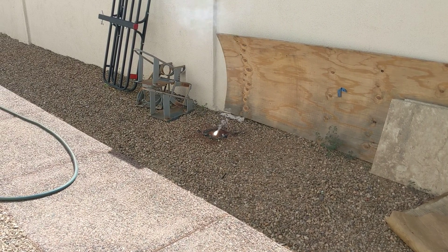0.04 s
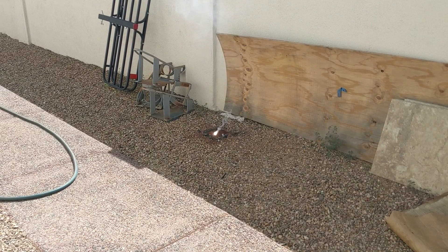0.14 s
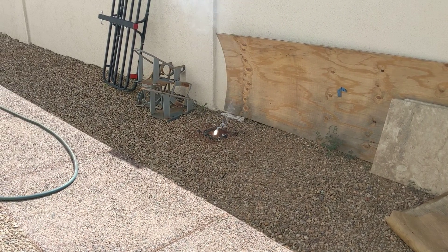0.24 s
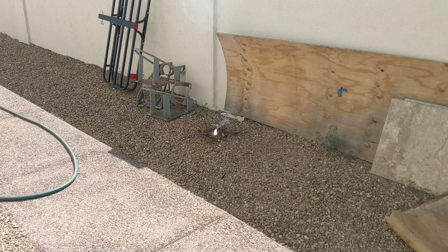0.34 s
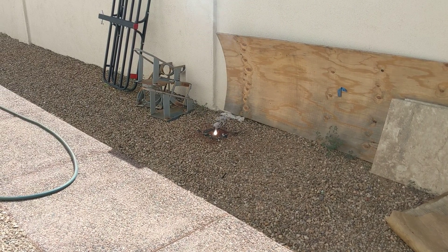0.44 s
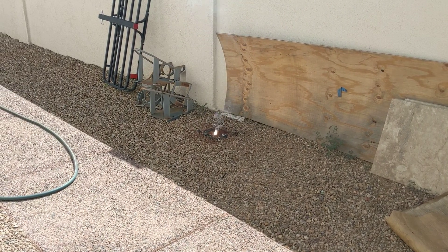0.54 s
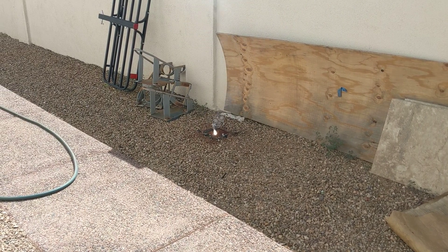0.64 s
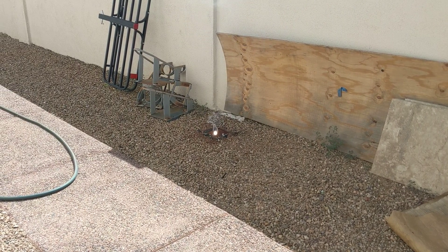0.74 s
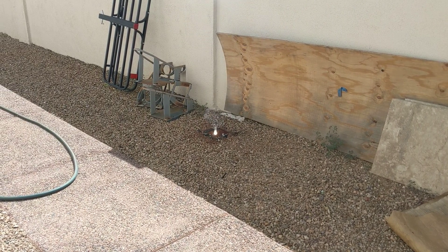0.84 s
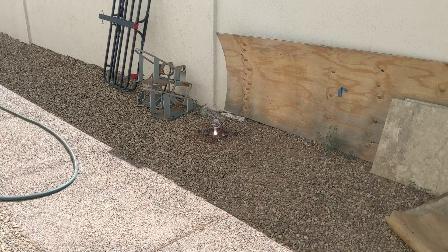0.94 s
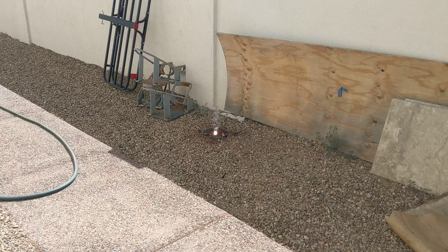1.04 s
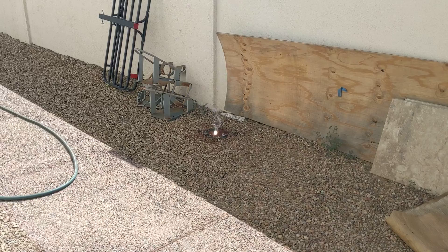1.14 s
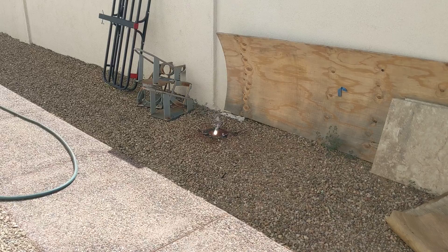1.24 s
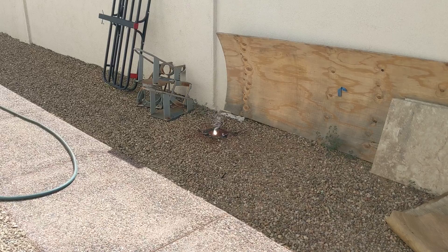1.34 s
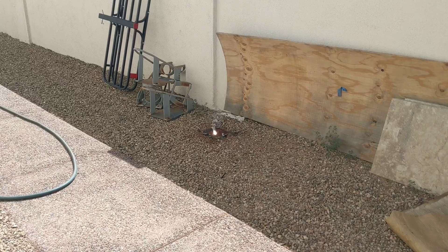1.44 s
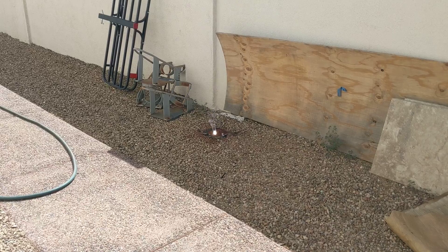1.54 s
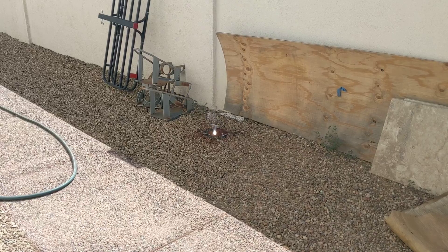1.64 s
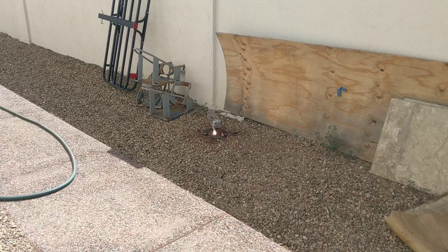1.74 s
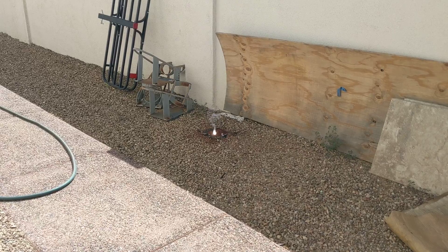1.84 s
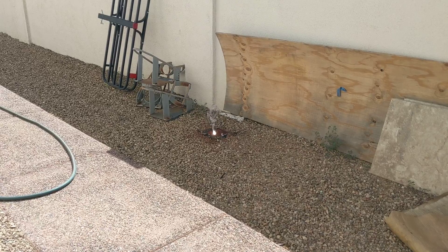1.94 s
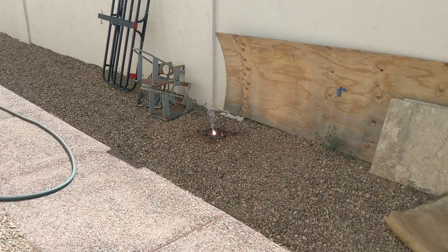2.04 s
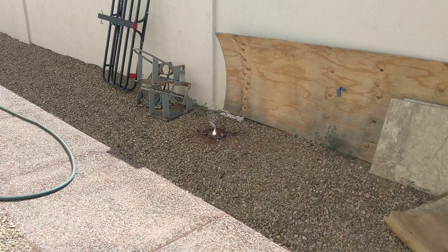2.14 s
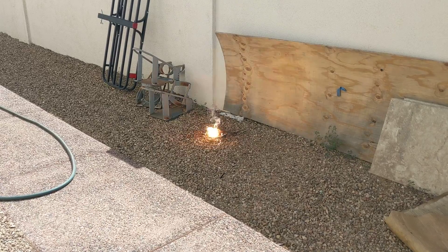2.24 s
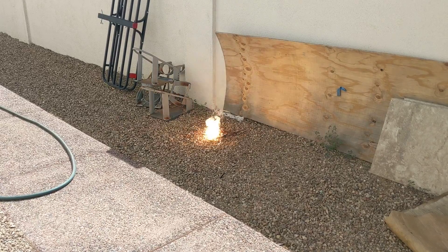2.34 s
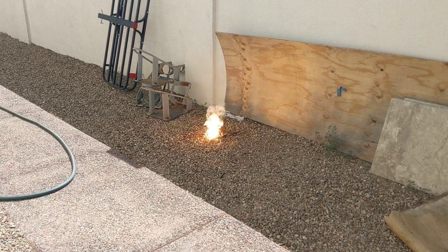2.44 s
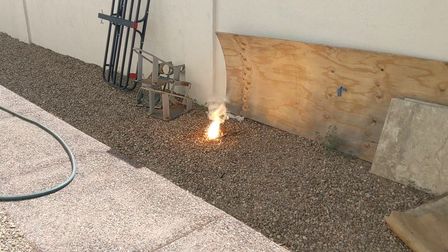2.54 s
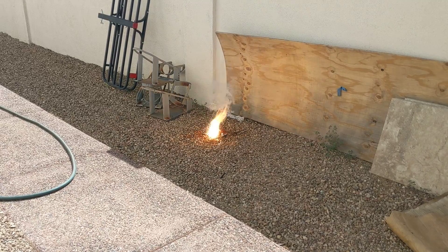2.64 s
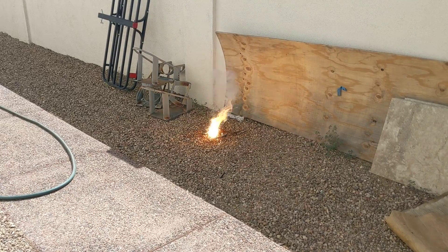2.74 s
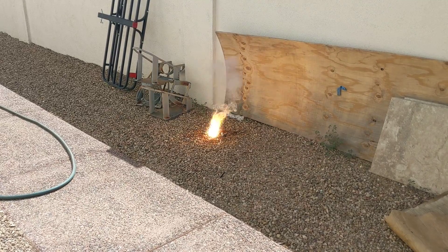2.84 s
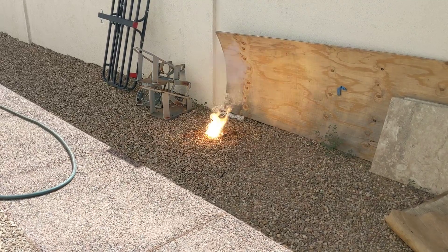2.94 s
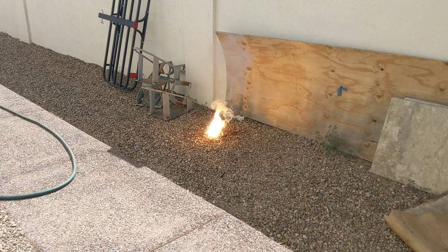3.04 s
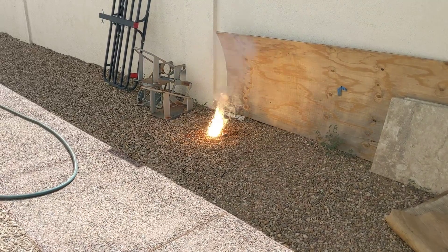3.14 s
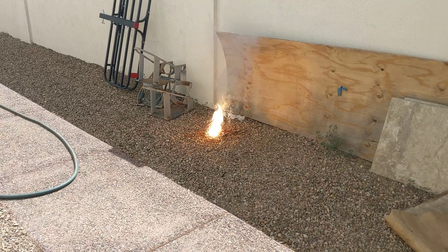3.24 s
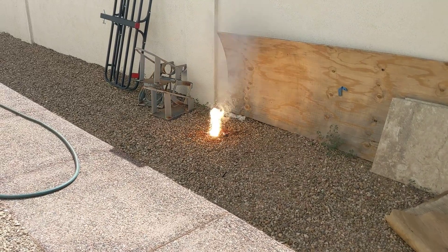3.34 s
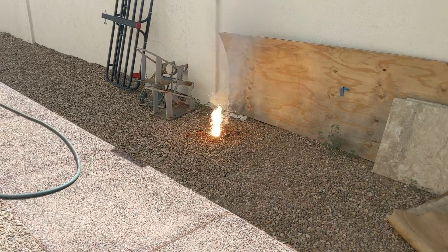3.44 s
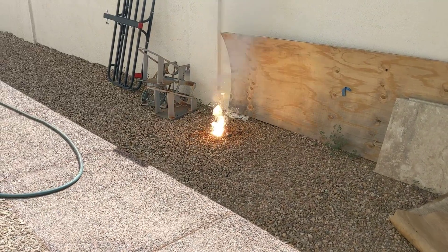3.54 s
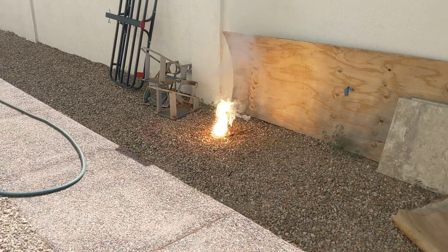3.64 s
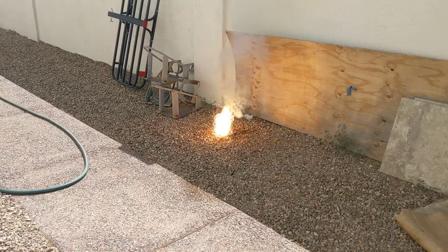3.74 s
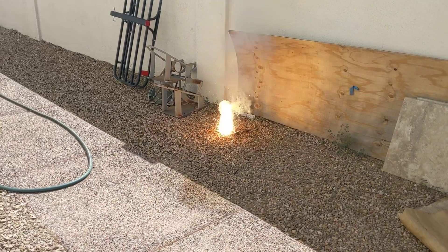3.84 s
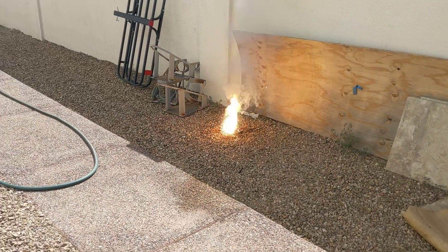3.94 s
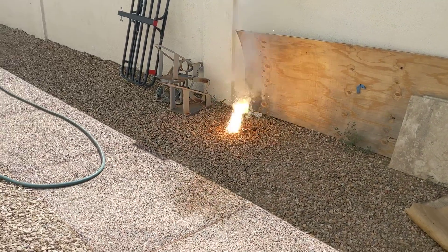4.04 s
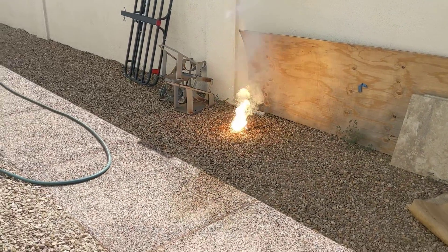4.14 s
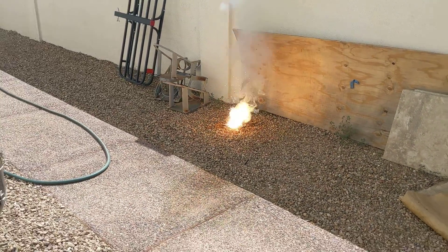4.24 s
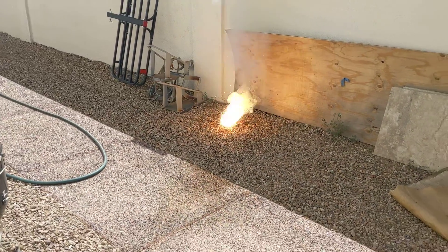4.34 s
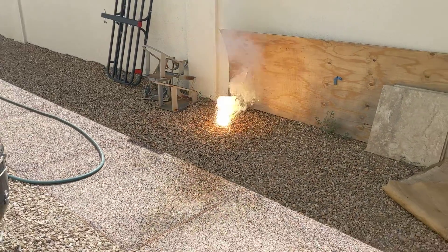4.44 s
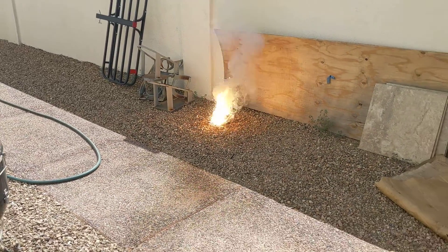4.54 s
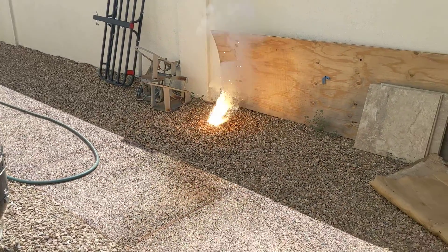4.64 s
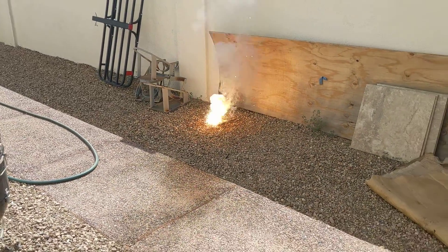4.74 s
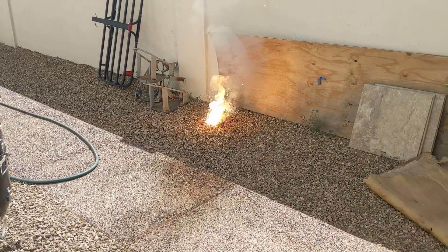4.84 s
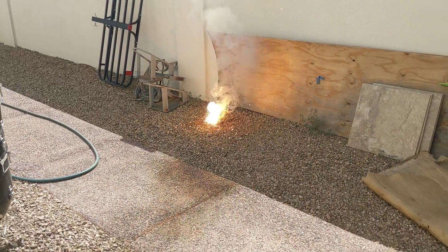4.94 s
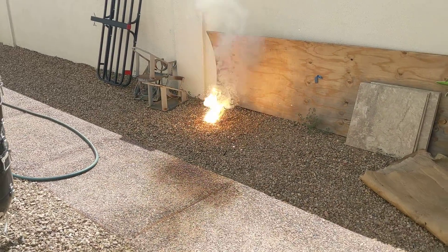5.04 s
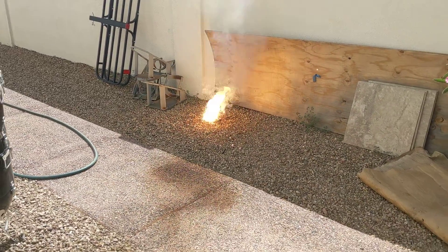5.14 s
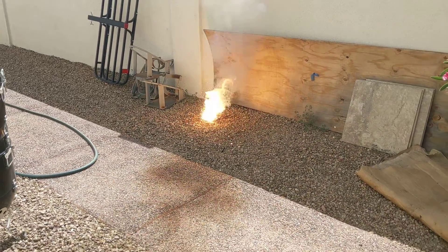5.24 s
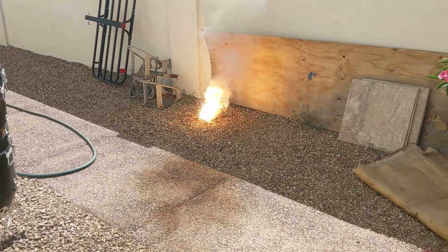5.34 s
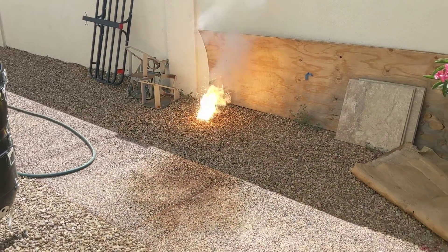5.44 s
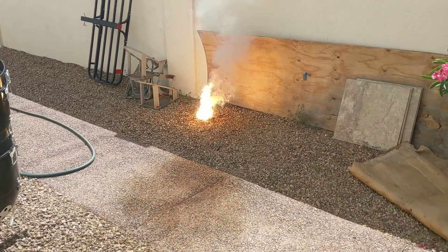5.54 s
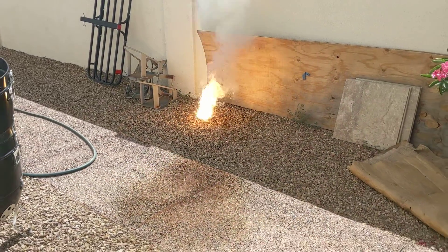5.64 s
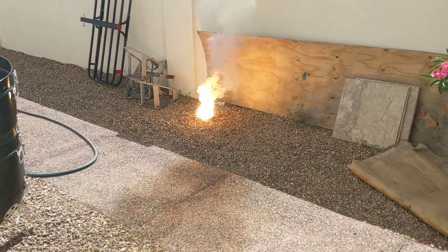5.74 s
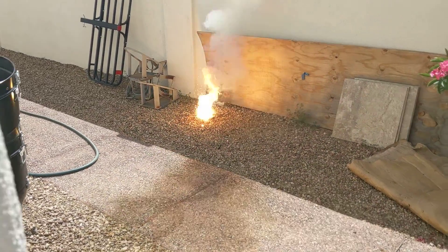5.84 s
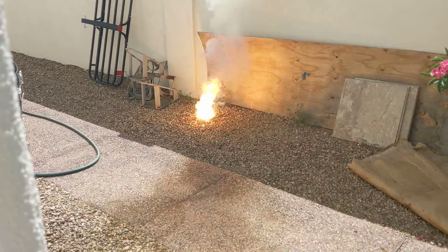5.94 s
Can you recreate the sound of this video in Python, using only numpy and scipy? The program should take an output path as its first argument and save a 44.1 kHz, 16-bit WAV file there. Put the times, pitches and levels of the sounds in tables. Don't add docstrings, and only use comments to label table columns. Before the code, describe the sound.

A quiet yard: far traffic, low drone, thin high hiss and one soft hand knock. Just after two seconds a charge in a stump lights with a sudden puff, then hisses and fizzes roughly over a low flame roar. It surges and chokes, with sharp spits clustering in the middle. Bounces from a near wall and gravel colour it; the hand-held stereo microphone a few metres off trembles, turns and gets bumped.

```python
import sys
import numpy as np
from scipy import signal
from scipy.fft import rfft, irfft, next_fast_len
from scipy.io import wavfile
from scipy.ndimage import uniform_filter1d, map_coordinates

SR = 44100
rng = np.random.default_rng(int(sys.argv[2]) if len(sys.argv) > 2 else 0)


def nominal_scale(level):
    x = np.asarray(level, float) / 20
    return 10 ** x


def unload_wav(signal):
    wavfile.write(
        sys.argv[1],
        SR,
        np.round(np.clip(np.atleast_2d(signal).T, -1, 1) * 32767).astype(np.int16),
    )


N = 263718
TIME = np.arange(N) / SR

# t/s, turned/0-1, left-right likeness of the hiss/0-1, right port in view/0-1
TURN = [
    (3.5, 0.47, 0.71, 0),
    (4.0, 0.97, 0.42, 0.01),
    (4.45, 1, 0.64, 0),
    (4.8, 0.9, 0.25, 0.97),
]


def unit(x):
    return x / np.sqrt(np.mean(x ** 2) + 1e-20)


def along(points, hz):
    f, v = np.transpose(points)
    return np.interp(np.log(hz + 1), np.log(f + 1), v)


def bumps_db(rows, hz):
    return sum(db * np.exp(-2 * ((hz - centre) / width) ** 2) for centre, width, db in rows)


def curves(rows):
    s, *columns = np.transpose(rows)
    return [np.interp(TIME, s, column) for column in columns]


def wobble(rate):
    knots = rng.standard_normal(int(N * rate / SR) + 4)
    return map_coordinates(knots, [np.arange(N) * rate / SR])


def filtered(x, response):
    m = next_fast_len(N + SR // 2)
    return irfft(rfft(x, m) * response(np.fft.rfftfreq(m, 1 / SR)), m)[..., :N]


def coloured(x, spectrum):
    return unit(filtered(x, lambda hz: nominal_scale(along(spectrum, hz))))


def mottled(x, depth_db, size, bins, frames):
    z = signal.stft(x, nperseg=size)[2]
    field = uniform_filter1d(rng.standard_normal(z.shape), size=bins, axis=-2)
    field = uniform_filter1d(field, size=frames, axis=-1)
    return signal.istft(z * nominal_scale(depth_db * unit(field)), nperseg=size)[1][..., :N]


def patchy(patchy_db):
    return mottled(rng.standard_normal(N), patchy_db, size=512, bins=8, frames=10)


def surge_db():
    # t/s, length/s, level/dB
    surges = [(2.591, 0.11, 3), (3.2, 0.058, 1.5), (3.346, .06, -3), (3.574, 0.014, 4), (3.847, 0.022, 5.5),
              (3.89, 0.031, -1.5), (3.985, .08, 1.5), (4.176, 0.043, 2.5), (4.308, 0.089, -3.5),
              (4.347, .04, 3), (4.443, 0.024, -1), (4.66, 0.085, 4.5), (4.952, 0.02, 4.5),
              (5.1, 0.041, 3.5), (5.3, 0.03, 3), (5.408, 0.047, 3), (5.605, 0.02, 2), (5.717, 0.05, 3),
              (5.834, 0.14, 2.5)]
    rise_s, hold_s, fall_s = 0.017, 0.058, 0.038
    t = TIME - 2.325
    rising = t / rise_s
    falling = (rise_s + hold_s + fall_s - t) / fall_s
    puff_db = 7 * np.clip(np.minimum(rising, falling), 0, 1)
    swell_db = sum(db * np.exp(-2 * ((TIME - s) / length * 2) ** 2) for s, length, db in surges)
    return puff_db, swell_db


def jet(lift_db):
    # t/s, gas pressure level/dB, boiling over the gas/dB
    burn = [(2.45, -53, 2), (2.9, -52.5, 2), (3.15, -51, 6), (3.5, -51, 4), (3.68, -48, 5), (4.1, -46, 0),
            (4.45, -45, 1.5), (4.53, -50, 5.5), (4.8, -47.5, 2), (5.1, -52, 6), (5.5, -50, 3),
            (5.98, -49, 5.5)]
    # f/Hz, density/dB
    gas_colour = [(700, -16), (1500, -2.5), (2500, -1), (5000, 2.5), (7000, -8.5), (9000, -16)]
    fizz_colour = [(5000, -18), (7000, -5), (9000, 0.5), (12000, 2), (16000, -1.5)]
    vent_colour = [(2500, -33), (2900, -7.5), (3150, -3.5), (3450, -5.5), (3900, -34)]
    pressure_db, boil_db = curves(burn)
    jet_db = pressure_db + lift_db
    vent_db = -59 + 2.6 * (jet_db + 44)
    alike = np.clip(curves(TURN)[1], 0, 1)
    sputter = nominal_scale(0.24 * wobble(70) + 0.73 * wobble(300) + 1.0 * wobble(1200))
    pair = np.array([patchy(1.1), patchy(1.0)])
    near, other = unit(mottled(pair, depth_db=2.5, size=1024, bins=2, frames=20))
    near += (rng.random(N) < .004) * nominal_scale(7 + 1.7 * rng.standard_normal(N)) * np.sign(near)
    gas = sputter * np.array([near, alike * near + np.sqrt(1 - alike ** 2) * other])
    hiss = nominal_scale(jet_db) * coloured(gas, gas_colour)
    fizz = nominal_scale(jet_db + boil_db) * coloured(gas, fizz_colour)
    return hiss + fizz + nominal_scale(vent_db) * coloured(gas, vent_colour)


def roar(puff_db):
    # t/s, level/dB
    flame_size = [(2.45, -8), (2.95, -7), (3.3, -6), (3.8, -3), (4.15, -1), (4.33, -3.5), (4.52, -1),
                  (4.7, -2), (4.88, 0.5), (5.1, -4), (5.75, -0.5), (5.98, -2)]
    # f/Hz, density/dB
    roar_colour = [(100, -15), (200, -17), (350, -5), (550, -9.5), (750, -28), (1000, -24.5)]
    throat_colour = [(400, -25), (600, -2), (950, 0.5), (1500, -1), (2200, -4.5), (3000, -22)]
    size_db = curves(flame_size)[0] + 0.8 * puff_db
    low_db = -56.5 + 1.5 * size_db + 0.93 * wobble(8.2)
    throat_db = -54.5 + 0.99 * size_db + 0.32 * wobble(9)
    low = nominal_scale(low_db) * coloured(patchy(-1.44), roar_colour)
    return low + nominal_scale(throat_db) * coloured(patchy(0.0), throat_colour)


def spits():
    # t/s, peak level/dB
    spit_times = [(2.4086, -36), (2.429, -33), (3.498, -22), (3.572, -21), (3.6063, -22), (3.846, -27),
                  (4.18, -23), (4.331, -24), (4.3994, -20), (4.417, -20), (4.4398, -17), (4.4505, -22),
                  (4.5157, -22), (4.6498, -20), (4.946, -23), (5.5972, -28), (5.868, -24)]
    # f/Hz, density/dB
    spit_colour = [(800, -10), (2000, -9.5), (4000, -1.5), (16000, 1.5)]
    t60_s, rise_s, pop_delay_s = 0.012, 0.0013, .0012
    out, t = np.zeros(N + SR), np.arange(SR // 10) / SR
    rise = 1 - np.exp(-t / rise_s)
    for s, db in spit_times:
        out[round((s + pop_delay_s) * SR)] -= nominal_scale(db + 1.5)
        puff = nominal_scale(db - 13.5 - 60 * t / t60_s) * rise * rng.standard_normal(len(t))
        out[round(s * SR):][:len(t)] += puff
    return filtered(out[:N], lambda hz: nominal_scale(along(spit_colour, hz)))


def fire():
    # f/Hz, width/Hz, level/dB
    comb_facing = [(400, 140, 13), (1026, 80, 9), (1350, 180, -0.5), (1580, 84, 4.5), (1870, 120, 0),
                   (2114, 34, 14.5), (2410, 136, 12.5), (2630, 110, 2.5), (2910, 150, 0.5), (3430, 340, 4)]
    comb_turned = [(418, 232, 9), (674, 63, 2.5), (940, 205, 6), (1130, 140, -2), (1570, 59, 2.5),
                   (2530, 150, -0.5), (3130, 190, 0.5)]
    puff_db, swell_db = surge_db()
    flame = jet(puff_db + swell_db) + roar(puff_db) + spits()
    facing = filtered(flame, lambda hz: nominal_scale(bumps_db(comb_facing, hz)))
    aside = filtered(flame, lambda hz: nominal_scale(bumps_db(comb_turned, hz)))
    turned = np.clip(curves(TURN)[0], 0, 1)
    lit = np.clip((TIME - 2.325) / 0.007, 0, 1)
    return lit * ((1 - turned) * facing + turned * aside)


def around_camera(flame):
    # f/Hz, lag/rad
    body_lag = [(950, 0), (1120, 1.6), (1550, 1.2), (1810, 3.3), (2150, 5.1), (2410, 6.3), (2800, 7.2),
                (3230, 7.7), (3875, 9.9), (4740, 11.9), (5600, 14.2), (16000, 40)]
    view = np.clip(curves(TURN)[2], 0, 1)
    hidden = filtered(flame[1], lambda hz: np.exp(-1j * np.interp(hz, *np.transpose(body_lag))))
    seen = filtered(flame[1], lambda hz: np.exp(-2j * np.pi * hz * .0001))
    return np.array([flame[0], np.sqrt(1 - view) * hidden + np.sqrt(view) * seen])


def walls(x, t60):
    t, step = np.arange(SR // 6) / SR, SR // 12
    out = np.zeros((2, N + SR))
    fade = np.sqrt(np.hanning(2 * step))
    for start in range(2 * SR, N - step, step):
        piece = x[:, start:start + 2 * step]
        tail = rng.standard_normal((2, len(t))) * nominal_scale(-60 * t / t60)
        tail /= np.linalg.norm(tail[0])
        wet = signal.fftconvolve(piece * fade[:piece.shape[1]], tail, axes=1)
        out[:, start:start + wet.shape[1]] += wet
    return out[:, :N]


def hand():
    # t/s, knock level/dB, knock f/Hz, swing level/dB
    knocks = [(1.0478, -31, 270, -35), (3.613, -59, 150, -44), (4.116, -35, 260, -32),
              (4.1191, -33.5, 232, -46), (4.2452, -35, 219, -48), (4.557, -34.5, 950, -60),
              (4.560, -34, 400, -31.5), (4.575, -33, 298, -48), (4.842, -34.5, 800, -38),
              (4.872, -29, 460, -62), (4.875, -38, 600, -36.5), (5.0326, -34, 220, -35.5),
              (5.037, -37, 260, -61), (5.158, -34.5, 230, -37.5), (5.324, -30.5, 290, -51),
              (5.651, -46, 143, -52), (5.672, -39, 218, -36), (5.697, -33.5, 250, -56),
              (5.8282, -35, 273, -40), (5.869, -39, 850, -56), (5.8735, -32.5, 490, -57),
              (5.935, -39.5, 250, -34), (5.941, -39, 250, -55)]
    lead = 400
    out, t = np.zeros(N + SR), np.arange(-lead, 2000) / SR
    for s, db, hz, swing_db in knocks:
        u = (np.pi * hz * t) ** 2
        knock = nominal_scale(db) * (1 - 2 * u) * np.exp(-u)
        swing = (t > 0) * np.sin(2 * np.pi * 102 * rng.uniform(.88, 1.1) * t)
        swing *= nominal_scale(swing_db - 60 * t / 0.071) * (1 - np.exp(-abs(t) / 0.0041))
        creak = np.convolve(rng.standard_normal(len(t)), np.blackman(int(SR / hz)), 'same')
        creak_rise = (t > 0) * (1 - np.exp(-abs(t) / .003))
        creak = creak_rise * nominal_scale(db - 12 - 60 * t / 0.05) * unit(creak)
        out[round(s * SR) - lead:][:len(t)] += knock + swing + creak
    return out[:N] * nominal_scale([[1.2], [-1.2]])


def ambient(spectrum):
    # f/Hz, coherence/0-1
    alike = [(60, 1), (130, 1), (300, 0), (450, 0.62), (700, 0.047), (1200, 0.63), (2000, 0), (3000, 0)]

    def mid_side(hz):
        turn = np.arccos(np.clip(along(alike, hz), -1, 1)) / 2
        return nominal_scale(along(spectrum, hz)) * [np.cos(turn), np.sin(turn)]

    pair = np.array([patchy(.8), patchy(.8)])
    mid, side = filtered(pair, mid_side)
    return unit(np.array([mid + side, mid - side]))


def drone(hz, width, db):
    skirt = [(hz - 2 * width, -40), (hz - width / 2, -3), (hz, 0), (hz + width / 2, -3), (hz + 2 * width, -40)]
    return nominal_scale(db) * ambient(skirt)


def yard():
    # t/s, rumble level/dB
    grip = [
        (0.1, -58),
        (0.5, -60.5),
        (3.3, -60.5),
        (3.55, -54.5),
        (4.0, -60.5),
        (4.2, -51),
        (4.6, -54),
        (4.8, -60.5),
        (5.1, -54),
        (5.98, -56),
    ]
    # f/Hz, width/Hz, level/dB
    hum = [
        (57, 12, -64.5),
        (118.8, 16, -67),
    ]
    # f/Hz, density/dB
    rumble_colour = [(13, -23), (22, 5), (113, -7), (140, -8), (216, -10), (257, -14), (300, -37),
                     (390, -55), (660, -120)]
    traffic_colour = [(88, -55), (150, -6), (258, -3.5), (356, -4.5), (384, -6), (514, -5), (823, -5.5),
                      (1980, -23.5), (5000, -31), (6500, -37), (11000, -120)]
    hiss_colour = [(1500, -20), (4800, -34), (5800, -12.5), (7500, -1), (9400, 0.5), (10500, -5),
                   (12000, -11), (14000, -23), (16000, -39)]
    # f/Hz, level/dB
    hiss_side = [(4000, 5), (8000, 4), (10500, -2.5), (12000, 13), (16000, 24)]
    rumble = nominal_scale(curves(grip)[0] + 1.5 * wobble(7.9)) * ambient(rumble_colour)
    drones = sum(drone(hz, width, db) for hz, width, db in hum)
    traffic = nominal_scale(-60.5 + 0.58 * wobble(4.2)) * ambient(traffic_colour) * nominal_scale([[.7], [-.7]])
    lean = lambda hz: nominal_scale(np.outer([0, -1], along(hiss_side, hz)))
    hiss = nominal_scale(-58 + 0.1 * wobble(0.38)) * filtered(ambient(hiss_colour), lean)
    return rumble + drones + traffic + hiss


def scene():
    flame = fire()
    return nominal_scale(0.12) * around_camera(flame) + nominal_scale(-5.5) * walls(flame, t60=0.09) + hand() + yard()


def low_pass(x):
    return signal.sosfilt(signal.butter(12, 16860, fs=SR, output="sos"), x)


def record(dry):
    # f/Hz, width/Hz, level/dB
    left_port = [(4050, 920, 2.5), (4700, 630, -5.5), (5750, 800, 3.5), (6280, 1300, 2.5), (7440, 320, 1),
                 (9610, 2420, 6.5), (11760, 700, 7.5), (15100, 5700, -1.5)]
    right_port = [(3700, 4100, 0.5), (5300, 150, 5), (5600, 365, 8), (6700, 730, 1.5), (9900, 1400, 4),
                  (10470, 960, -9), (13540, 4100, -10), (15100, 2800, 1.5)]
    # f/Hz, lead/rad
    bass_lead = [(20, .1), (45, .35), (90, .7), (130, 1.0), (260, 1.95), (400, 1.9), (650, 1.1), (950, .1),
                 (1200, 0)]

    def ports(hz):
        gain = nominal_scale([bumps_db(left_port, hz) + 0.25, bumps_db(right_port, hz) - .7])
        lag = np.array([np.exp(-1j * along(bass_lead, hz)), np.ones(len(hz))])
        return gain * lag * (hz < 15830)

    mix = filtered(dry, ports)
    return low_pass(mix)


dry = scene()
out = record(dry)
unload_wav(out)
```